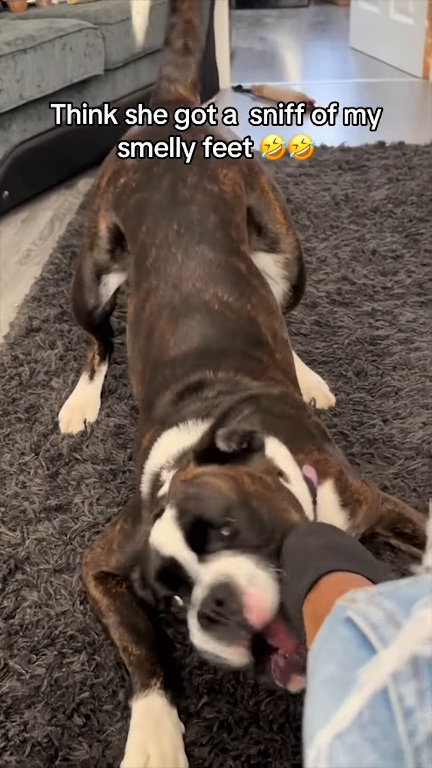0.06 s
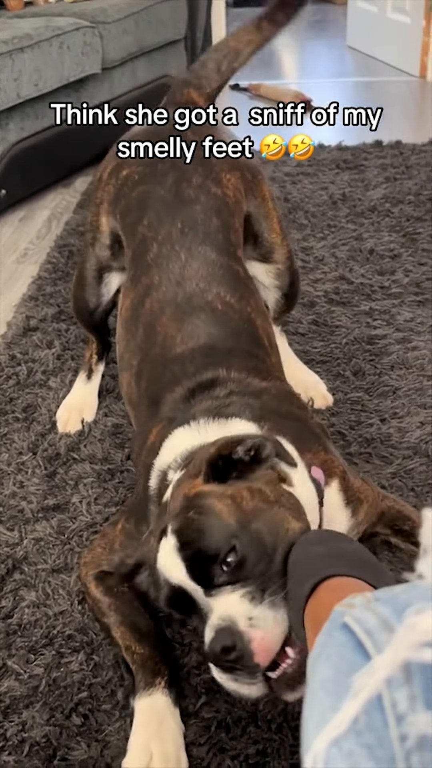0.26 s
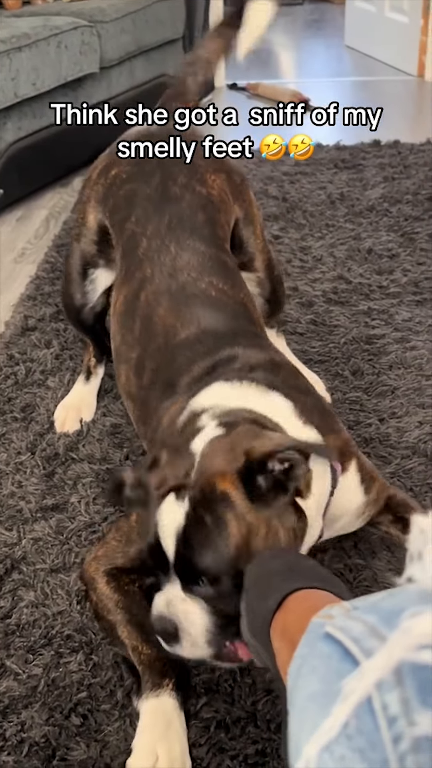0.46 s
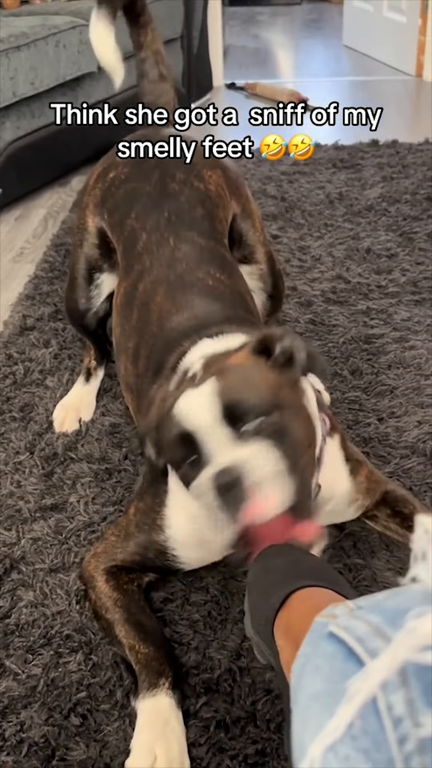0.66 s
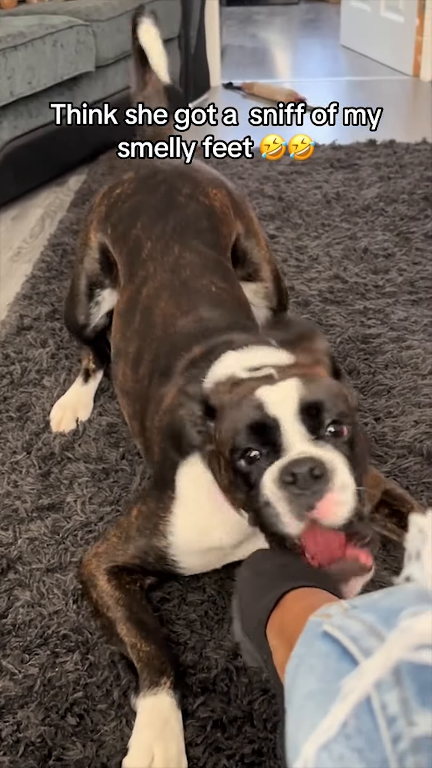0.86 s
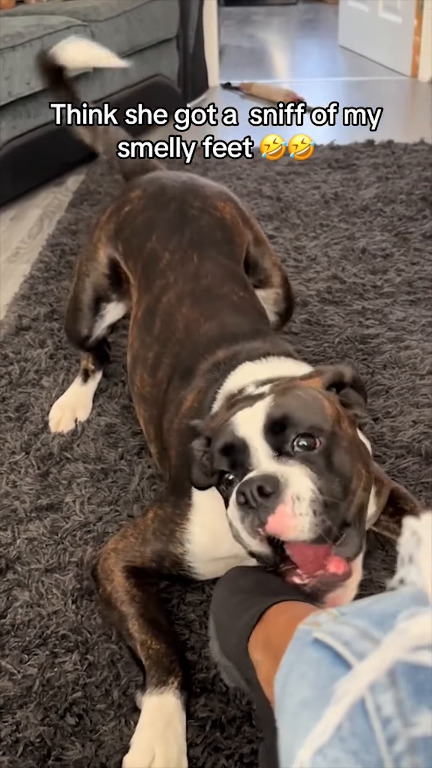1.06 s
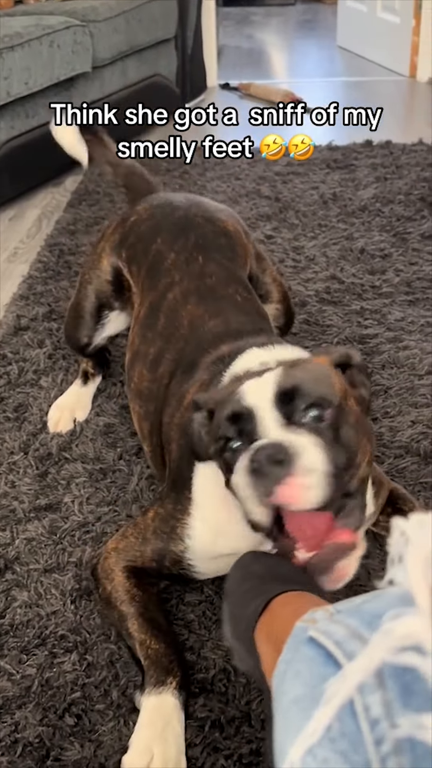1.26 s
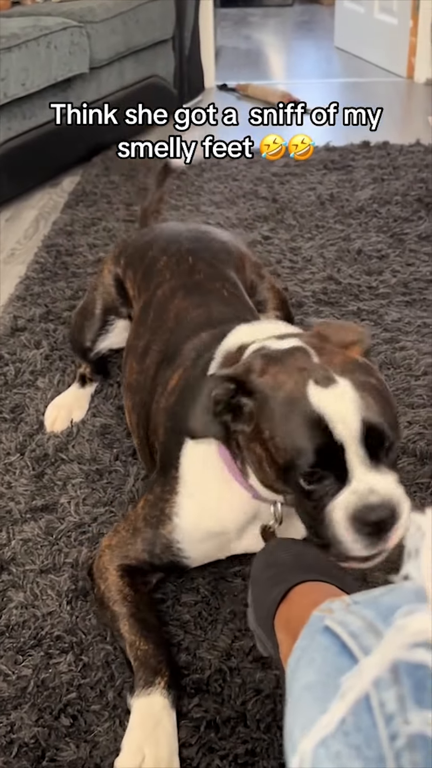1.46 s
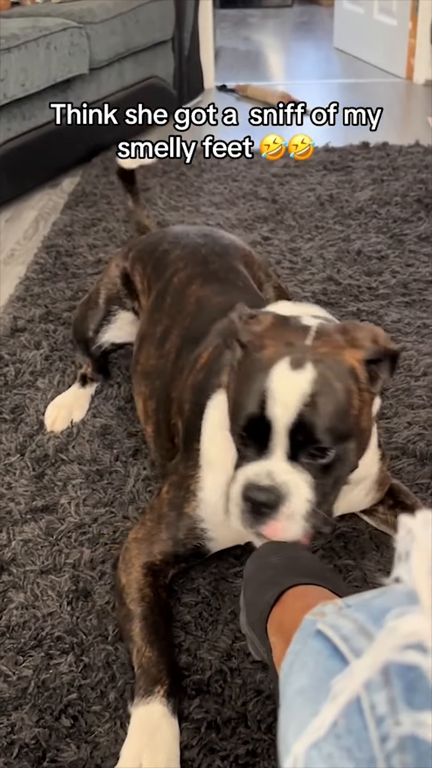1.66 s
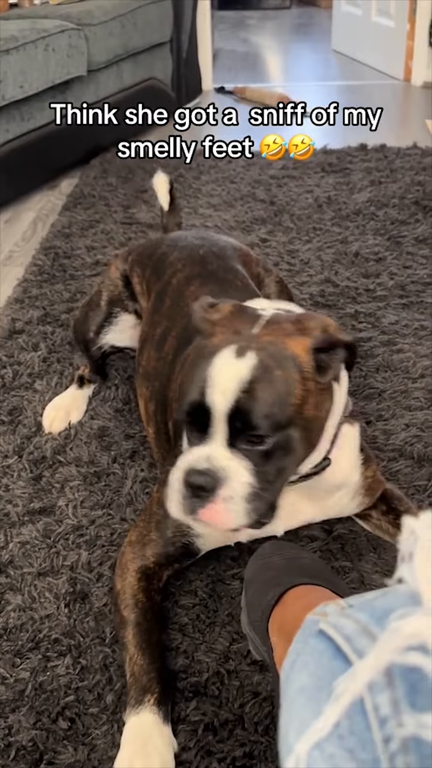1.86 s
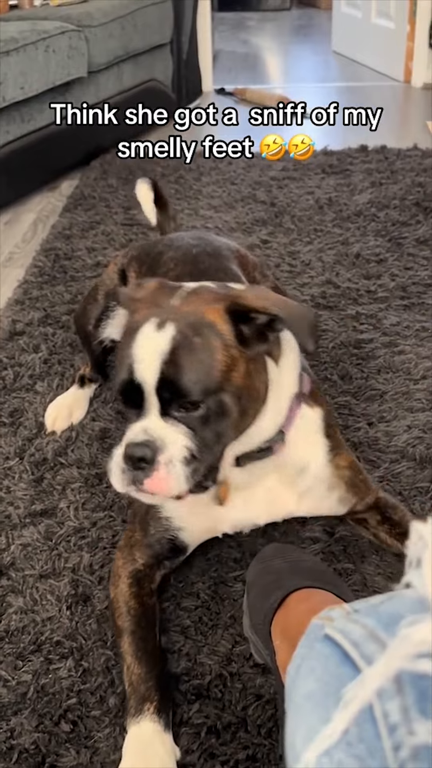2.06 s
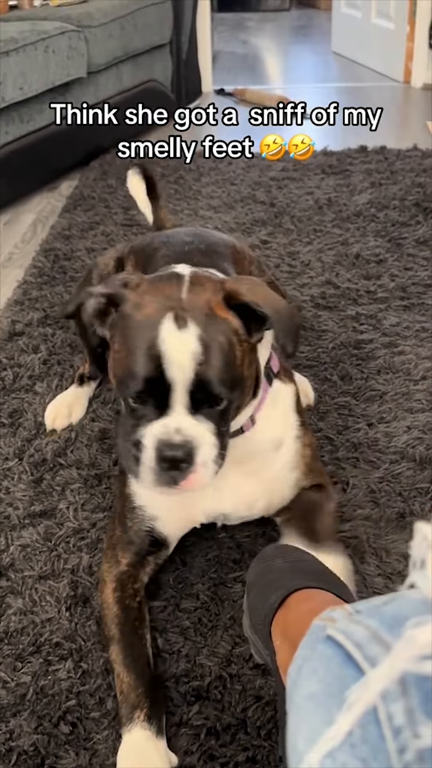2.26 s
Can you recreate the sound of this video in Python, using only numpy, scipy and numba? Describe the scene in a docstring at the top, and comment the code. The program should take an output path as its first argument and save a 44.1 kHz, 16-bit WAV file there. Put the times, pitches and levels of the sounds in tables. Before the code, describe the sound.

Two low, raspy play growls from a big dog, close up, with lip smacks.

```python
"""Big dog, playful growls

A big dog lies on a living-room rug and growls twice in play while mouthing a foot. Slow, uneven
pulses of the vocal folds boom in the chest, ring in throat and mouth, and chop the air into a rasp.
Around the growls it huffs, grunts and smacks its lips, then snuffles; at the end a paw drags over
the rug. A short, soft room tail and a quiet room tone sit behind it all."""
import sys
import numpy as np
from scipy import signal
from scipy.fft import rfft, irfft
from scipy.io import wavfile
from scipy.ndimage import uniform_filter1d
from numba import njit

SR = 44100
rng = np.random.default_rng(int(sys.argv[2]) if len(sys.argv) > 2 else 0)


def unload_audio(sound):
    """Save the sound as a 16-bit wav file, at the path given as the first command line argument."""
    columns = np.transpose(np.atleast_2d(sound))
    # keep every value between -1 and 1, then stretch to whole-number steps
    steps = np.round(np.clip(columns, -1, 1) * 32767)
    wavfile.write(sys.argv[1], SR, steps.astype(np.int16))


N = 101429
TIME = np.arange(N) / SR

# Open-mouthed huffs, low grunts, surges of the growl into the chest, snuffles and paw strokes.
# Each row: start in seconds, attack in seconds, decay in seconds, level in dB.
HUFFS = [(0, 0.00044, 0.06, -35), (.185, 0.028, 0.014, -41.5), (1.03, 0.05, 0.028, -33.5),
         (1.155, 0.0078, 0.03, -31.5), (1.174, 0.003, 0.0071, -41.5), (1.215, 0.0062, 0.029, -39),
         (1.398, 0.012, 0.012, -29)]
GRUNTS = [(0, 0.0049, 0.025, -40), (.198, .01, 0.017, -43), (1.165, .02, 0.014, -39.5),
          (1.29, 0.0061, 0.016, -37)]
SURGES = [(.22, .06, .1, -34), (.47, .06, .12, -27.5), (1.44, .12, .06, -33)]
SNUFFLES = [(1.62, 0.052, 0.03, -45.5), (1.81, 0.11, 0.039, -58)]
PAW_DRAGS = [(2.08, 0.15, 0.13, -58.5), (2.24, 0.039, 0.044, -51), (2.276, 0.0028, 0.015, -51.5)]
# Noise colours of the huff, the breath under the growl, the nose, the rug and the room tone.
# Each row: frequency in Hz, relative level in dB.
HUFF_COLOUR = [(35, -38), (60, 1.5), (183, -11.5), (253, -5), (399, -21.5), (536, -17.5), (658, -21),
               (755, -11), (1460, -16), (1840, -25), (2900, -24), (4790, -38.5), (8870, -43.5),
               (12200, -56), (14000, -56.5)]
HISS_COLOUR = [(2500, -8), (3800, 1), (5500, -2.5), (7500, -2), (10500, -13.5), (12000, -31), (15000, -19)]
NOSE_COLOUR = [(470, -8), (800, -9), (1080, -6), (1730, -16.5), (2350, -14.5), (2600, -19), (3410, -13),
               (3820, 3), (4540, -13.5), (9320, -16), (12400, -69), (13200, -27), (15500, -29)]
RUG_COLOUR = [(24, -45), (40, -3.5), (122, 3.5), (339, -20.5), (561, -17), (753, -21), (900, -28),
              (1600, -32), (6000, -44), (7800, -61), (13200, -120)]
ROOM_TONE_COLOUR = [(15, -16.5), (25, -12), (101, 2.5), (213, -9), (363, -8), (488, -16), (621, -13),
                    (2780, -11), (3090, -12), (4380, -16), (5880, -30), (7680, -6.5), (8780, -31),
                    (15000, -43.5)]
# Pitch line of the vocal folds. Each row: time in seconds, pitch in Hz.
FOLD_PITCH = [(.2, 90.07), (.25, 88.62), (.3, 94.97), (.37, 93), (.43, 97.35), (.5, 99.02), (.6, 102.2),
              (.7, 96), (.8, 90.12), (.86, 94.9), (.95, 92.27), (1.05, 91.2), (1.15, 80.72), (1.33, 88.26),
              (1.45, 83.96), (1.6, 86.1), (1.68, 76.8)]
# Fader of the chest tone over both growls and their dying purr. Each row: time in seconds, level in dB.
CHEST_LEVEL = [(.19, -92), (.225, -24.5), (.26, -22), (.44, -20.5), (.6, -19.5), (.75, -23.5), (.8, -25.5),
               (.85, -20.5), (.95, -21.5), (1.05, -24), (1.1, -43.5), (1.28, -55.5), (1.31, -36.5),
               (1.33, -22.5), (1.42, -26.5), (1.612, -23.5), (1.655, -37.5), (1.81, -58.5), (1.86, -78)]
# The folds catch and the chest tone ducks. Each row: time in seconds, depth in dB.
CATCHES = [(.275, 2.5), (0.479, 3), (0.546, -0.5), (0.622, 12), (0.777, 12), (.868, 18), (0.897, 8.5),
           (1.405, 12.5), (1.553, 2)]
# Wet smacks of lips, tongue and palate. Each row: start in seconds, level in dB, ring pitch in Hz.
SMACKS = [(.027, -38.5, 5500), (0.072, -37.5, 5200), (0.141, -36, 1246), (.208, -31, 677),
          (0.229, -25, 2850), (.251, -13, 1055), (.266, -21, 2820), (.268, -24.5, 3860), (0.307, -11, 1071),
          (.328, -22, 2410), (.372, -23.5, 2385), (.422, -19, 1100), (.538, -24, 604), (.565, -31.5, 640),
          (.884, -21, 870), (.981, -19.5, 862), (1.039, -21.5, 880), (1.162, -30, 2835), (1.181, -21, 774),
          (1.23, -36.5, 3940), (1.299, -20.5, 702.8), (1.327, -10.5, 713), (1.37, -19, 2273),
          (1.514, -25.5, 876.7)]
# Faders of the two growls. Each row: time in seconds, then throat, mouth and rasp in relative dB.
LONG_GROWL = [(0.205, -38.5, -40, -52.5), (0.25, -26, -32, -43), (0.384, -29.5, -32, -46.5),
              (0.398, -23.5, -36, -59), (0.422, -24, -31, -58), (0.44, -24.5, -51, -58.5),
              (0.5, -27, -39.5, -58.5), (0.548, -27.5, -49, -61.5), (0.555, -32, -43, -46),
              (0.57, -23, -34, -43.5), (0.622, -31, -41.5, -44.5), (0.638, -26.5, -35.5, -54),
              (0.656, -35.5, -32.5, -40), (0.68, -37, -31, -49), (0.702, -26.5, -26, -37),
              (0.724, -29.5, -35, -57), (0.75, -37, -33.5, -45.5), (0.812, -27.5, -39.5, -71.5),
              (0.89, -34, -37.5, -61.5), (1.036, -31, -30.5, -49.5), (1.084, -42, -38.5, -47.5),
              (1.12, -50, -68, -68)]
SHORT_GROWL = [(1.299, -33.5, -31.5, -46.5), (1.352, -33, -27.5, -36.5), (1.365, -31.5, -26.5, -36),
               (1.386, -32.5, -32, -42), (1.45, -28, -39.5, -53.5), (1.508, -29.5, -43.5, -70),
               (1.558, -33.5, -41, -73), (1.616, -29, -45, -78), (1.629, -34, -59, -66),
               (1.684, -64, -73.5, -81), (1.76, -56.5, -88, -91)]
# How loosely palate and lips flap and leak air. Each row: time in seconds, amount as a factor.
LOOSENESS = [(.42, 1.4), (.47, .5), (.66, .9), (.8, .6), (1.05, .8), (1.38, 1.1), (1.45, .4)]
# The two lowest mouth formants ride the jaw. Each row: time in seconds, lower in Hz, upper in Hz.
JAW_FORMANTS = [(.22, 704, 1040), (.42, 745, 1132), (.47, 529.2, 653), (.54, 500, 644), (.58, 630, 888),
                (.7, 630, 901), (1.02, 584, 833.5), (1.12, 610, 947.4), (1.3, 680, 700), (1.36, 638, 744),
                (1.46, 640, 840), (1.62, 670.3, 839)]
# Resonances of the throat, three shapes of the lips, the chest's hollows and the room's low end.
# Each row: centre in Hz, width in Hz, relative level in dB.
THROAT_MODES = [(140, 30, 9), (210, 30, -4), (255, 34, 3), (418, 40, -5), (530, 45, -11)]
LIPS_BITING = [(1982, 210, 1.5), (2508, 315, 0.5), (3023, 69, -2.5), (3900, 200, -10), (5470, 360, -16),
               (7230, 1200, -19.5), (10100, 1300, -21.5)]
LIPS_GAPING = [(1450, 260, 3.5), (1910, 700, 3.5), (2400, 720, 0), (3134, 460, -5.5), (3767, 740, -2),
               (4965, 1400, -9), (7400, 1800, -16.5), (9500, 2300, -22)]
LIPS_CLOSING = [(1140, 320, 14), (1530, 475, -3.5), (2188.4, 410, 6), (3000, 270, -7.5), (4160, 620, -15.5),
                (7100, 3900, -30), (9600, 1400, -23)]
CHEST_HOLLOWS = [(138, 40, 0), (250, 40, -2)]
ROOM_MODES = [(77, 6, -9), (140, 9, -7), (216, 8, -13), (257, 7, -7)]
# Early reflections off floor and furniture. Each row: delay in seconds, gain as a factor.
REFLECTIONS = [(.0021, -0.061), (.0083, 0.11), (0.0134, 0.18)]

THROAT_BAND_HZ = (118, 560)
THROAT_TRIM_DB, MOUTH_TRIM_DB, RASP_TRIM_DB = -1.5, 1, 3.5
HISS_DB, ROOM_TONE_DB = -55.5, -66.5


def from_db(db):
    """Decibels to gain."""
    return 10 ** (np.asarray(db) / 20)


def rms_one(x):
    """Scale to rms 1."""
    return x / np.sqrt(np.mean(x ** 2) + 1e-20)


def levelled(x, size=1100):
    """Ride the gain to hold the running rms near 1."""
    power = uniform_filter1d(uniform_filter1d(x * x, size), size // 2)
    return x / np.sqrt(np.abs(power) + 1e-12)


def curves(rows):
    """One automation curve for each column after the time."""
    s, *columns = np.transpose(rows)
    return [np.interp(TIME, s, c) for c in columns]


def swells(table):
    """An envelope of smooth rises, each followed by an exponential fall."""
    return sum(from_db(db) * np.sin(np.pi / 2 * np.clip((TIME - s) / attack, 0, 1)) ** 2
               * np.exp(-np.maximum(TIME - s - attack, 0) / decay) for s, attack, decay, db in table)


def drift(rate_hz, step=40):
    """Smooth random modulation with a spread of 1."""
    r = np.exp(-2 * np.pi * step * rate_hz / SR)
    slow = signal.lfilter([1], [1, -2 * r, r * r], rng.standard_normal(N // step + 2002))[2000:]
    return np.interp(np.arange(N) / step, np.arange(len(slow)), rms_one(slow))


def band(x, low_hz, high_hz, order=2):
    """Band-pass."""
    return signal.sosfilt(signal.butter(order, [low_hz, high_hz], "band", fs=SR, output="sos"), x)


def coloured_noise(colour, width=.14):
    """Stereo noise at rms 1, centred but for its treble."""
    hz, db = np.transpose(colour)
    bins_hz = np.maximum(np.arange(N // 2 + 1) * SR / N, 1)
    eq = from_db(np.interp(np.log(bins_hz), np.log(hz), db))
    mid, side = irfft(rfft(rng.standard_normal((2, N))) * eq, N)
    return rms_one(mid + width * band(side, 5800, 13000, order=4) * np.array([[1], [-1]]))


def resonance(x, hz, width_hz):
    """One resonance with unity gain at its peak."""
    r = np.exp(-np.pi * width_hz / SR)
    poles = [1, -2 * r * np.cos(2 * np.pi * hz / SR), r * r]
    return signal.lfilter(np.array([1, 0, -1]) * (1 - r * r) / 2, poles, x + 1e-18)


def cavity(x, modes):
    """Parallel resonances in alternating polarity."""
    return sum((-1) ** k * from_db(db) * resonance(x, hz, width)
               for k, (hz, width, db) in enumerate(modes))


@njit
def glide(x, turn, r):
    """A resonance whose centre moves; turn is in radians per sample."""
    out, state = np.zeros(len(x)), 0j
    for i in range(len(x)):
        state = state * r * np.exp(1j * turn[i]) + x[i]
        out[i] = state.real * (1 - r)
    return out


def formant(x, hz, width_hz):
    """A moving resonance, applied twice for steep flanks."""
    turn, r = 2 * np.pi * hz / SR, np.exp(-np.pi * width_hz / SR)
    return glide(glide(x, turn, r), turn, r)


def wavering_cavity(x, modes, wander=.018):
    """Parallel formants, each straying a little from its centre."""
    return sum((-1) ** k * from_db(db) * formant(x, hz * (1 + wander * drift(rate_hz=14)), width)
               for k, (hz, width, db) in enumerate(modes))


def huffs():
    """Short pushes of breath through the open mouth."""
    return band(swells(HUFFS) * coloured_noise(HUFF_COLOUR), 50, 10500, order=5)


def vocal_folds(jitter=.07, alternate_db=2, shimmer_db=3.5, slaps_per_s=140, puff_s=.0054):
    """Folds snap shut unevenly, palate and lips slap in between, and each pulse lets out a puff."""
    pitch_hz, = curves(FOLD_PITCH)
    looseness, = curves(LOOSENESS)
    cycles = np.cumsum(pitch_hz * (1 + jitter * drift(rate_hz=70))) / SR
    closures = np.diff(np.floor(cycles), prepend=0)
    closures *= from_db(alternate_db * np.cos(np.pi * cycles))   # every other pulse hits harder
    slaps = .62 * looseness * (rng.random(N) < slaps_per_s / SR)
    pulses = (closures + slaps) * from_db(shimmer_db * np.minimum(rng.standard_normal(N), 1))
    opening = signal.lfilter([1], [1, -np.exp(-1 / (puff_s * SR))], pulses + 1e-18)
    puffs = uniform_filter1d(opening, size=50) * rng.standard_normal(N)
    return cycles, rms_one(pulses), rms_one(puffs)


def chest_boom(cycles, level, shimmer_db=2.4, alternate_db=1.5, catch_s=.01):
    """The fundamental booms in the chest: grunts, and a growl tone that ducks where the folds catch."""
    wobble_db = shimmer_db * drift(rate_hz=70) + alternate_db * np.cos(np.pi * cycles)
    boom = np.sqrt(2) * np.cos(2 * np.pi * cycles) * from_db(wobble_db)
    duck_db = sum(depth_db * np.exp(-((TIME - s) / catch_s) ** 2) for s, depth_db in CATCHES)
    return band((level * from_db(-duck_db) + swells(GRUNTS)) * boom, 76.2, 840, order=6)


def smacks(rise_cycles=.8, decay_cycles=4.3):
    """Wet lips part: a pocket of air rings for a few cycles, with a little spray."""
    out = np.zeros(N)
    for s, db, hz in SMACKS:
        cycles = np.maximum(TIME - s, 0) * hz
        spray = rms_one(band(rng.standard_normal(N), hz / 2, hz * 2))
        envelope = (1 - np.exp(-cycles / rise_cycles)) * np.exp(-np.minimum(cycles / decay_cycles, 20))
        ring = envelope * (np.sin(2 * np.pi * cycles) + .45 * spray)
        out += from_db(db) * band(ring, hz / 2, hz * 1.13, order=3)
    return out


def growl_faders(fade_s=.003):
    """Gains of throat, mouth and rasp, faded in and out around each growl."""
    gains = 0
    for rows in (LONG_GROWL, SHORT_GROWL):
        inside_s = np.minimum(TIME - rows[0][0], rows[-1][0] - TIME)
        gains = gains + from_db(curves(rows)) * np.clip(1 + inside_s / fade_s, 0, 1)
    return gains


def throat_rumble(pulses, puffs):
    """Pulses and a little air ring the throat; the nasal branch swallows one narrow band."""
    hollow = cavity(pulses + .16 * puffs, THROAT_MODES)
    notched = hollow - resonance(hollow, hz=315, width_hz=50)
    return levelled(band(notched, *THROAT_BAND_HZ, order=4))


def mouth_vowel(pulses, puffs, upper_db=3):
    """Pulses and leaking air ring two formants that move with the jaw."""
    lower_hz, upper_hz = curves(JAW_FORMANTS)
    looseness, = curves(LOOSENESS)
    drive = pulses + looseness * puffs
    lower = formant(drive, lower_hz, width_hz=404)
    upper = formant(drive, upper_hz, width_hz=185)
    return levelled(band(lower + from_db(upper_db) * upper, 470, 1354, order=3))


def muzzle_rasp(pulses, puffs, gape_at_s=.444, close_at_s=1.1, move_s=.058):
    """Chopped air rasps through restless lips that go from biting to gaping to closing."""
    drive = pulses + 27 * puffs
    opened, closed = (np.clip((TIME - s) / move_s, 0, 1) for s in (gape_at_s, close_at_s))
    rasp = (1 - opened) * wavering_cavity(drive, LIPS_BITING)
    rasp += (opened - closed) * wavering_cavity(drive, LIPS_GAPING)
    rasp += closed * wavering_cavity(drive, LIPS_CLOSING)
    return levelled(band(rasp, 1100, 9840, order=6))


def chest_surges(puffs):
    """The growl sinks into the chest and swells as the puffs fill its hollows."""
    hollow = wavering_cavity(puffs, CHEST_HOLLOWS)
    return swells(SURGES) * levelled(band(hollow, *THROAT_BAND_HZ, order=4))


def voice():
    """Grunts and growls: the folds drive chest, throat, mouth and muzzle over a hiss of breath."""
    chest = from_db(curves(CHEST_LEVEL)[0])
    throat, mouth, rasp = growl_faders()
    cycles, pulses, puffs = vocal_folds()
    mix = chest_boom(cycles, chest)
    mix += from_db(THROAT_TRIM_DB) * throat * throat_rumble(pulses, puffs)
    mix += from_db(MOUTH_TRIM_DB) * mouth * mouth_vowel(pulses, puffs)
    mix += from_db(RASP_TRIM_DB) * rasp * muzzle_rasp(pulses, puffs)
    mix += chest_surges(puffs)
    hiss_gain = from_db(HISS_DB) * (chest / chest.max()) ** .67   # gently follows the chest fader
    return mix + hiss_gain * coloured_noise(HISS_COLOUR, width=.32)


def snuffles():
    """Thin, bright breaths through the nose."""
    return swells(SNUFFLES) * coloured_noise(NOSE_COLOUR)


def paw_drag():
    """A paw rubs over the rug with a dull, soft brush."""
    return swells(PAW_DRAGS) * coloured_noise(RUG_COLOUR)


def with_reflections(x, low_cut_hz=520):
    """The direct sound, plus its mids and highs bouncing off floor and furniture."""
    bright = signal.sosfilt(signal.butter(3, low_cut_hz, "high", fs=SR, output="sos"), x)
    return x + sum(gain * np.array([np.interp(TIME - delay, TIME, side, left=0) for side in bright])
                   for delay, gain in REFLECTIONS)


def room_reverb(x, t60_s=.5, tail_db=-15, width=.8):
    """A short, soft tail, wider in the mids, and a few lingering low modes."""
    age = TIME[:SR // 2]
    tails = band(rng.standard_normal((2, len(age))), 330, 2100, order=1)
    tails *= from_db(-60 * age / t60_s) * (age > .004)   # decay after a 4 ms pre-delay
    send = band(x, 440, 13000)
    mid, side = (signal.fftconvolve(send, tail / np.sqrt(np.sum(tail ** 2)))[:N] / 2 for tail in tails)
    stereo = mid + width * band(side, 420, 1334, order=4) * np.array([[1], [-1]])
    return from_db(tail_db) * stereo + cavity(x, ROOM_MODES)


def scene():
    """The dog up close, in a quiet room."""
    dog = with_reflections(voice() + smacks() + huffs()) + snuffles() + paw_drag()
    return dog + room_reverb(dog.mean(axis=0)) + from_db(ROOM_TONE_DB) * coloured_noise(ROOM_TONE_COLOUR)


def record(dry, stop_hz=16600):
    """A steep high cut takes off the very top."""
    return signal.sosfilt(signal.cheby2(12, 70, stop_hz, fs=SR, output="sos"), dry)


dry = scene()
out = record(dry)
unload_audio(out)
```